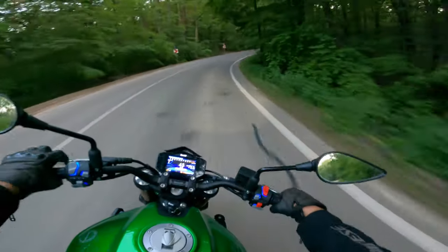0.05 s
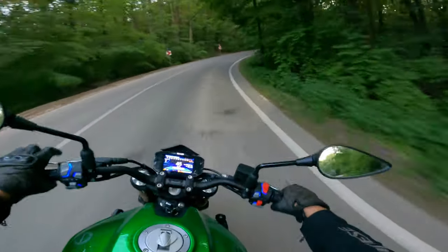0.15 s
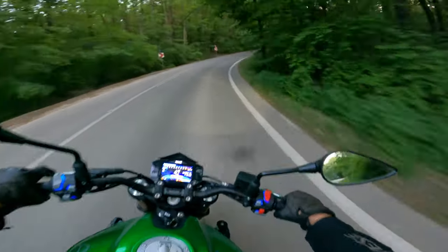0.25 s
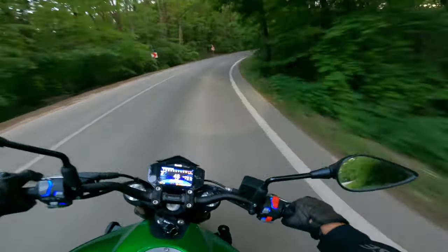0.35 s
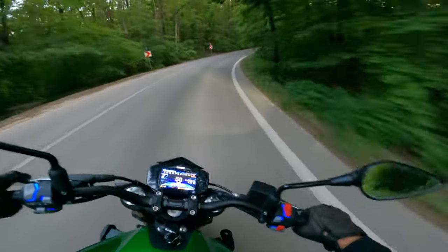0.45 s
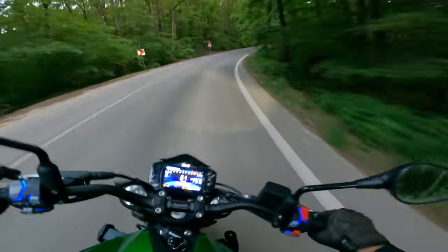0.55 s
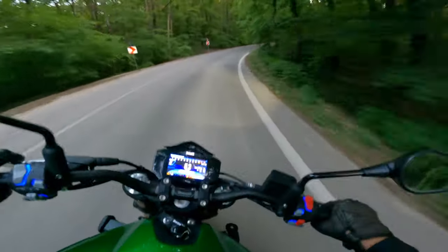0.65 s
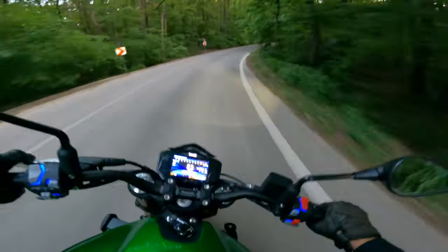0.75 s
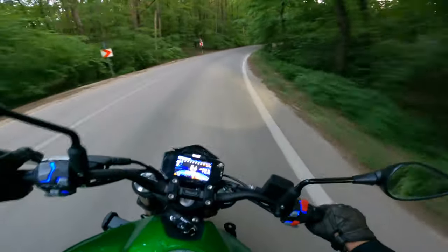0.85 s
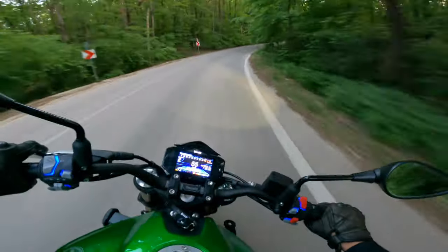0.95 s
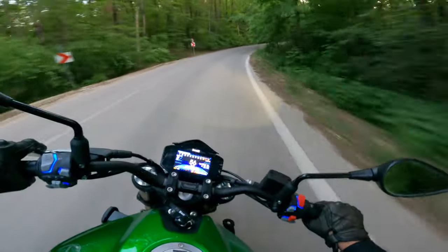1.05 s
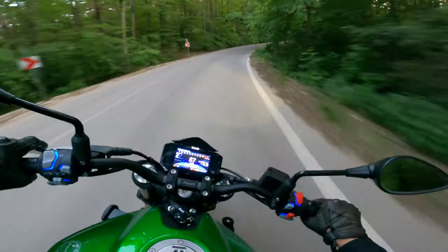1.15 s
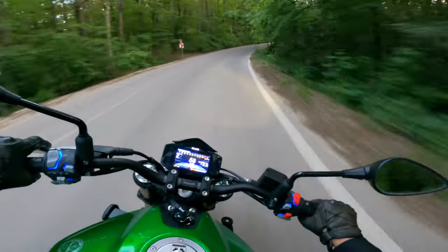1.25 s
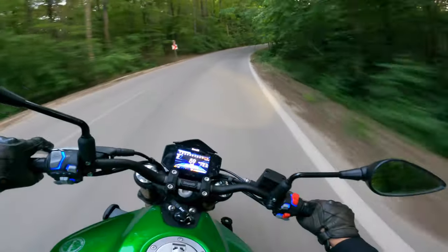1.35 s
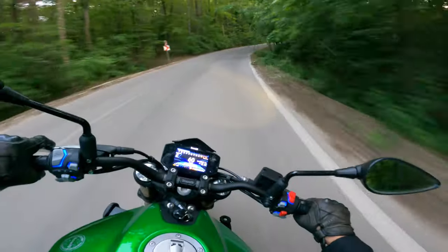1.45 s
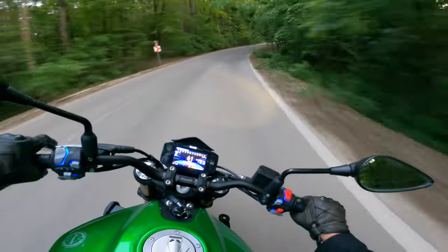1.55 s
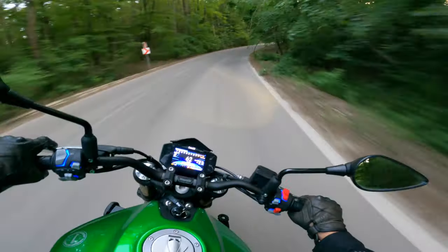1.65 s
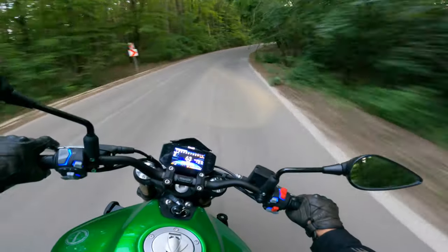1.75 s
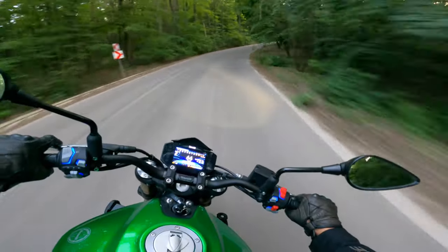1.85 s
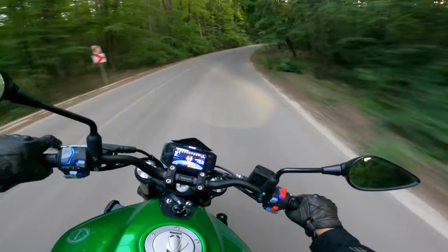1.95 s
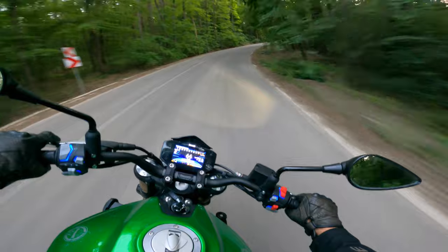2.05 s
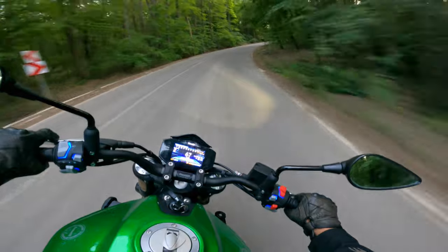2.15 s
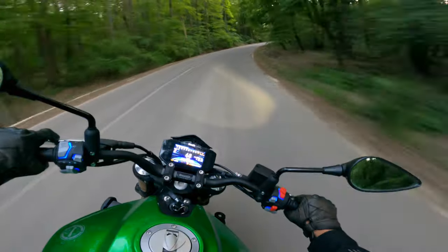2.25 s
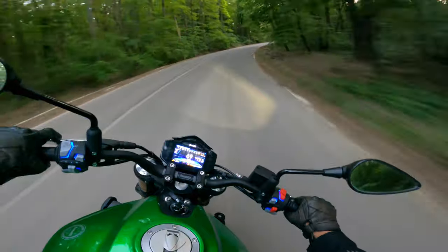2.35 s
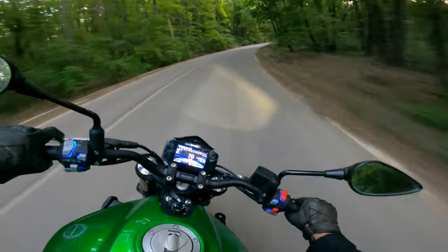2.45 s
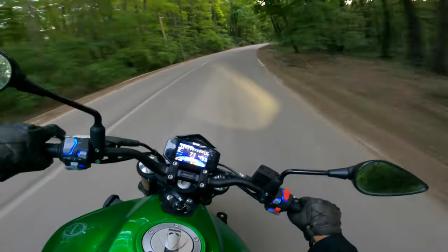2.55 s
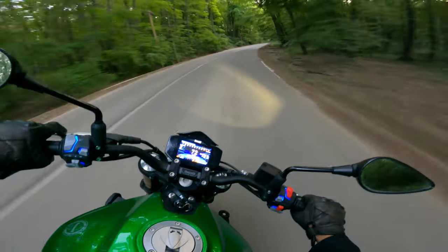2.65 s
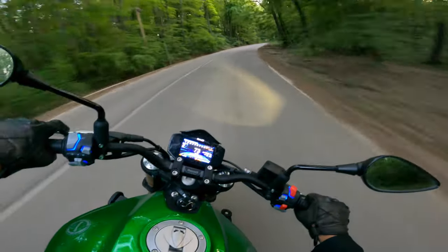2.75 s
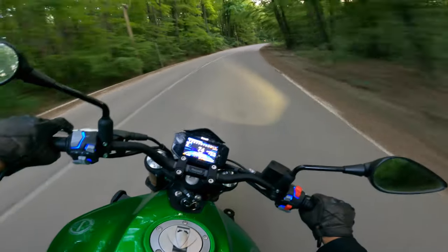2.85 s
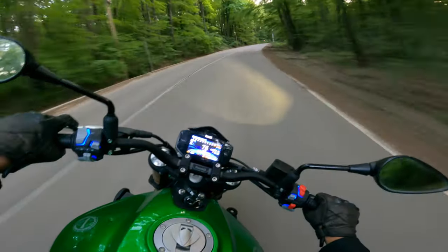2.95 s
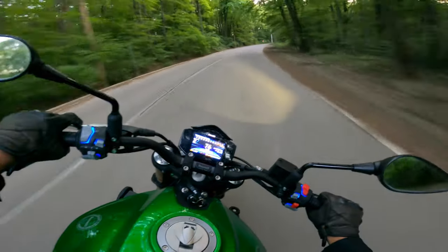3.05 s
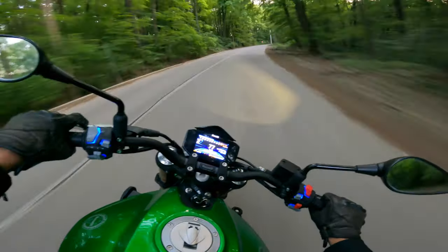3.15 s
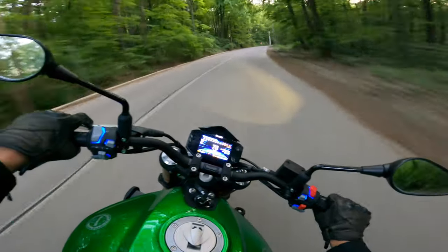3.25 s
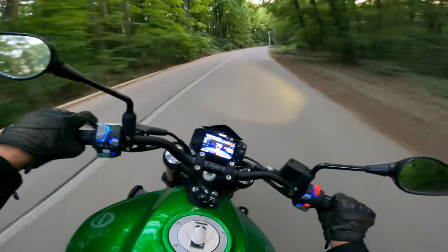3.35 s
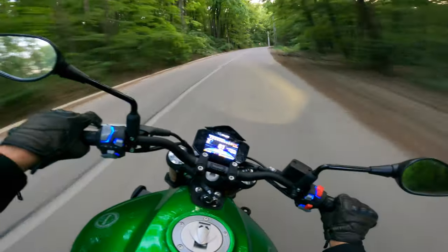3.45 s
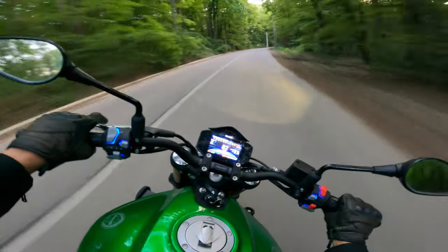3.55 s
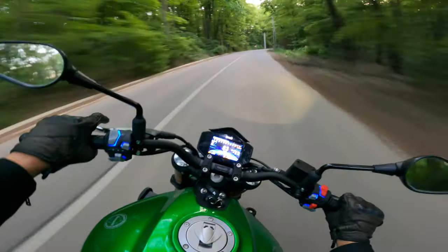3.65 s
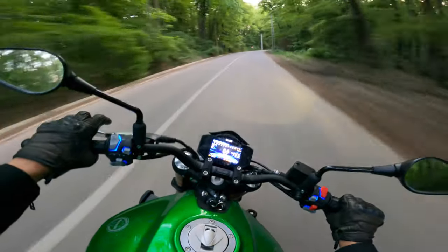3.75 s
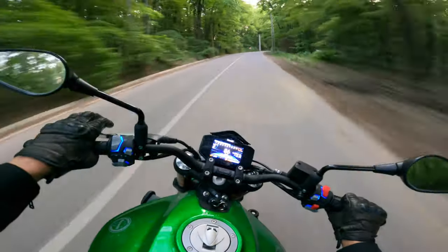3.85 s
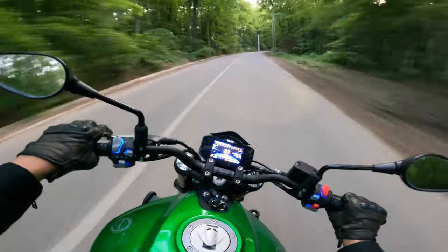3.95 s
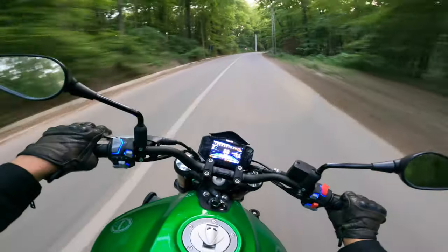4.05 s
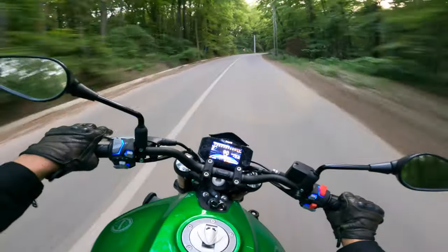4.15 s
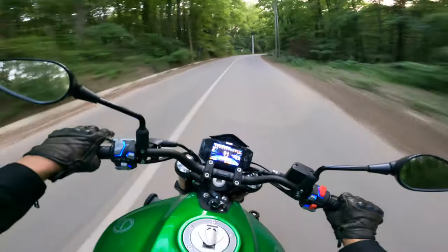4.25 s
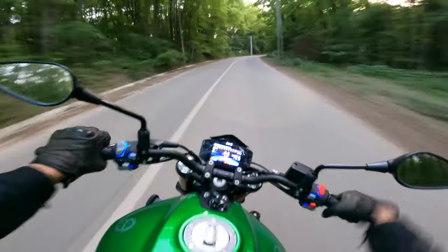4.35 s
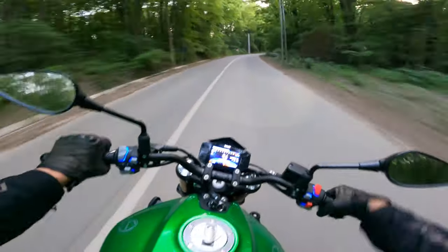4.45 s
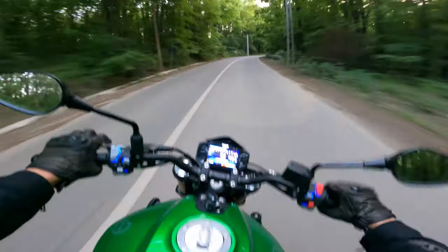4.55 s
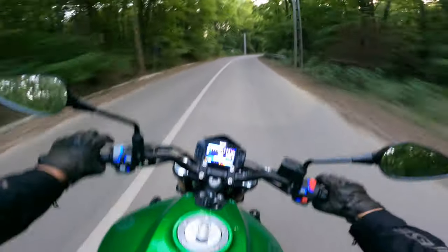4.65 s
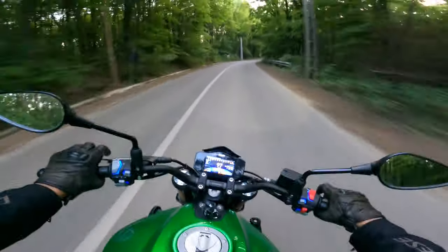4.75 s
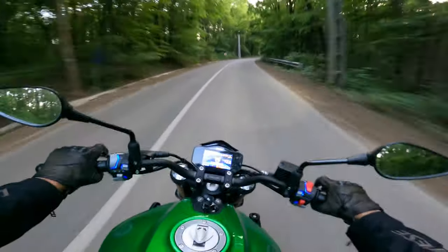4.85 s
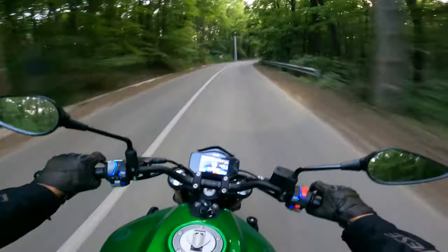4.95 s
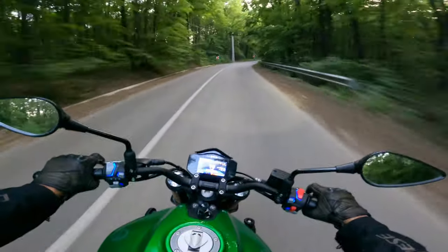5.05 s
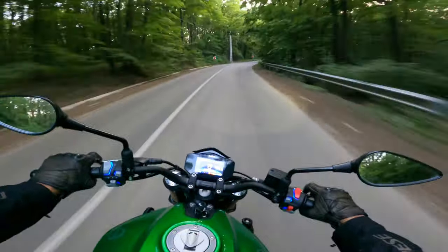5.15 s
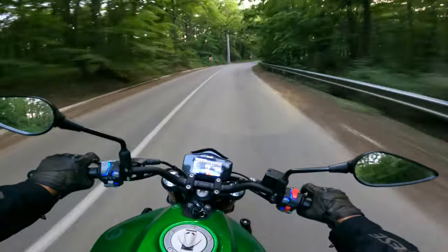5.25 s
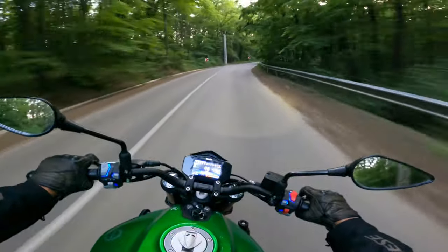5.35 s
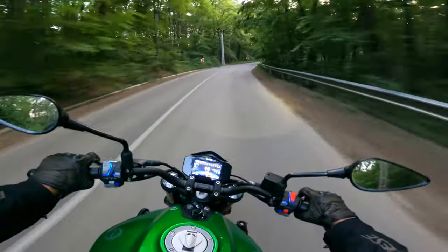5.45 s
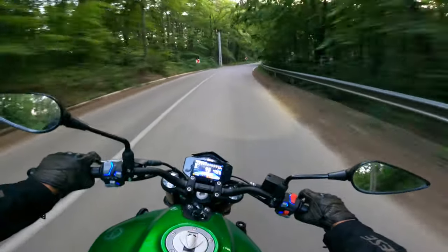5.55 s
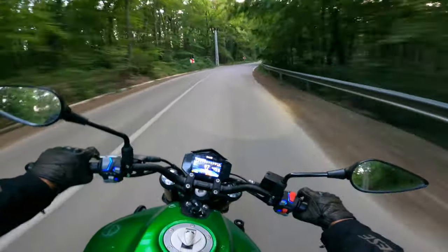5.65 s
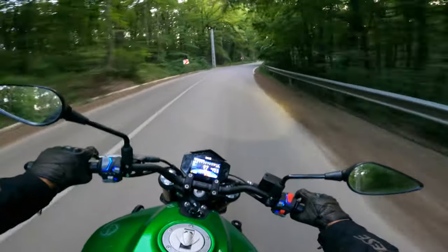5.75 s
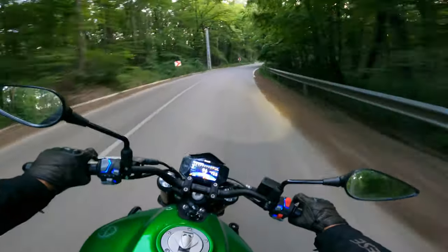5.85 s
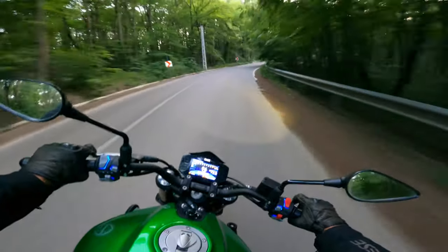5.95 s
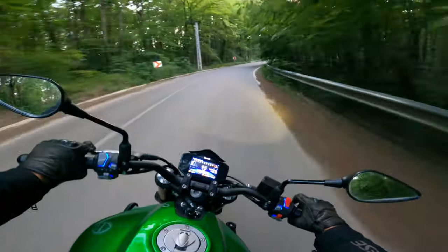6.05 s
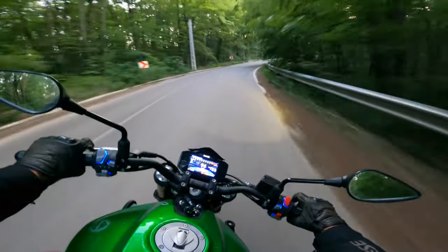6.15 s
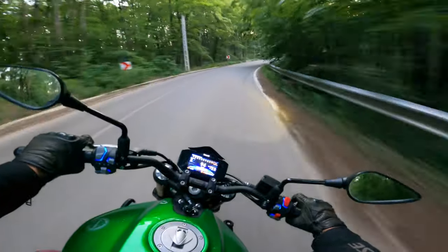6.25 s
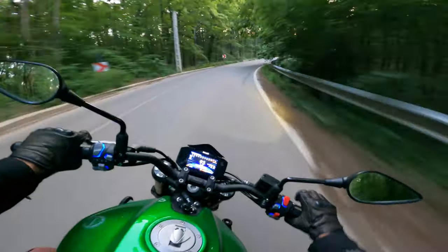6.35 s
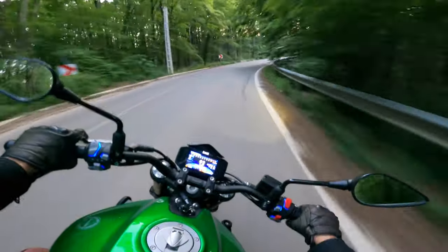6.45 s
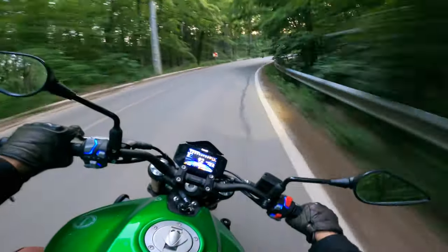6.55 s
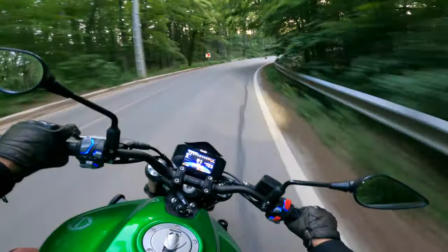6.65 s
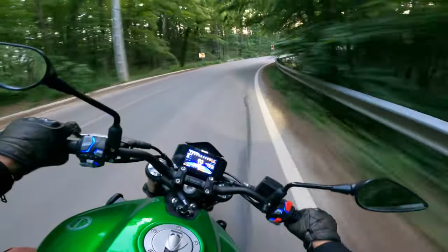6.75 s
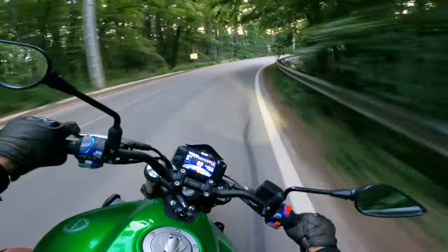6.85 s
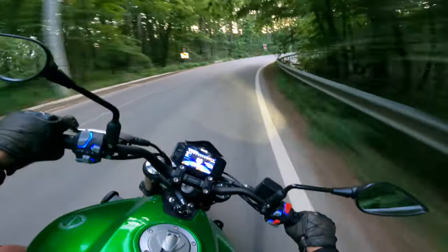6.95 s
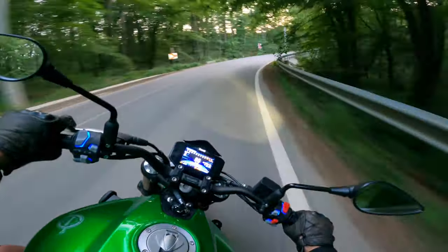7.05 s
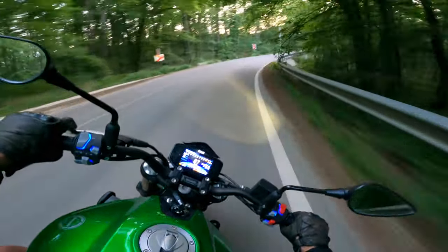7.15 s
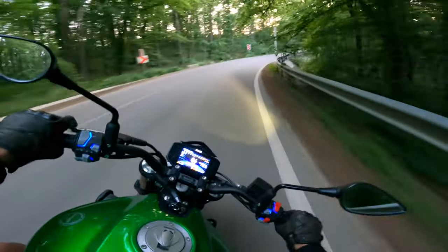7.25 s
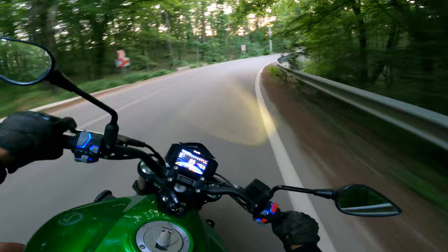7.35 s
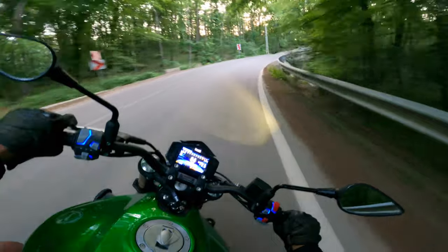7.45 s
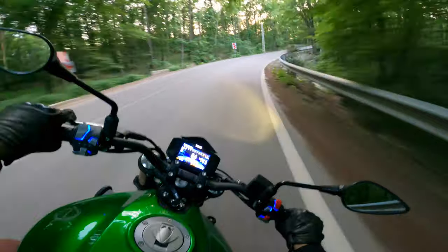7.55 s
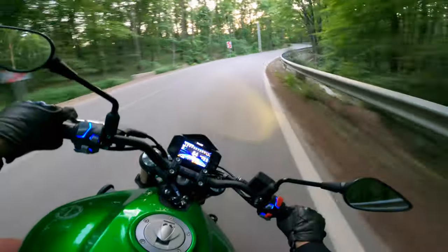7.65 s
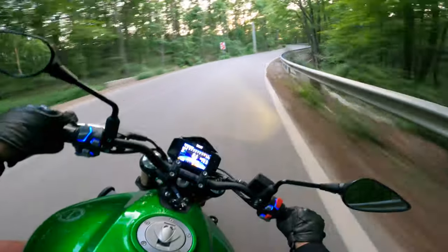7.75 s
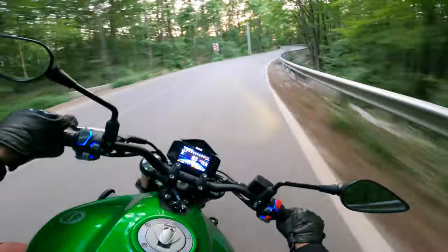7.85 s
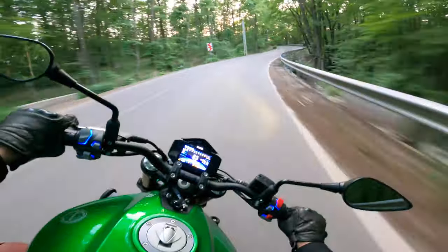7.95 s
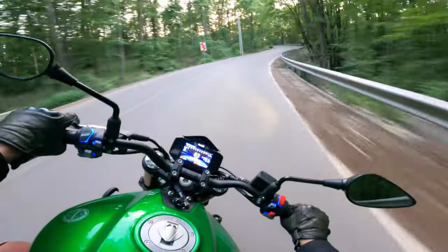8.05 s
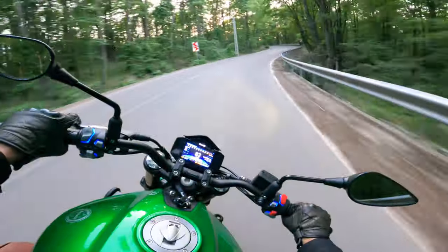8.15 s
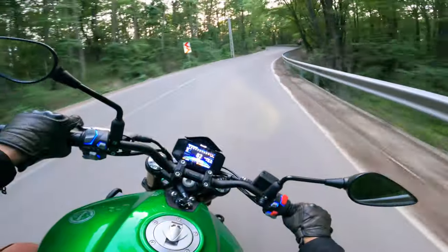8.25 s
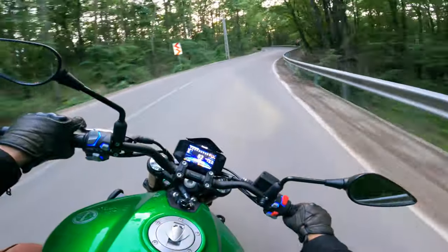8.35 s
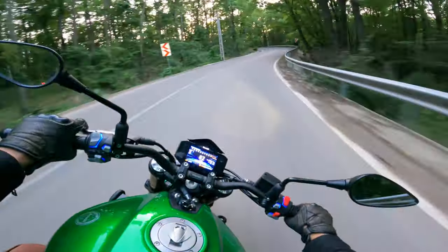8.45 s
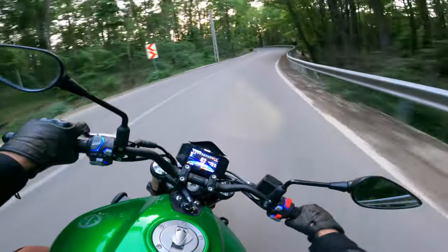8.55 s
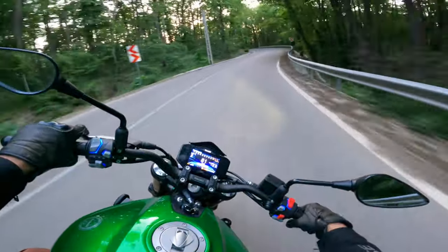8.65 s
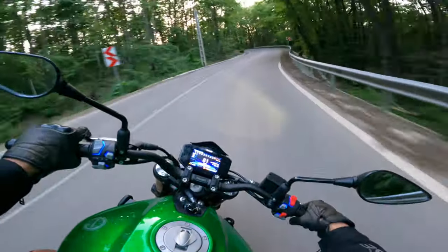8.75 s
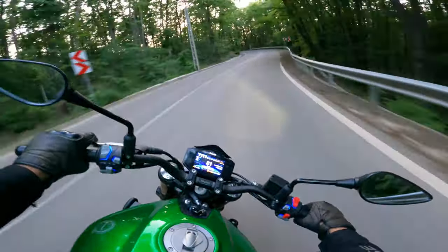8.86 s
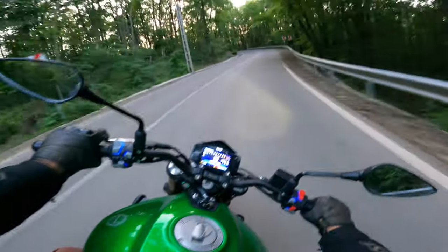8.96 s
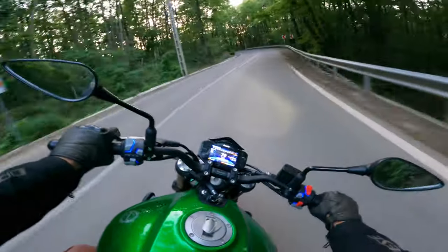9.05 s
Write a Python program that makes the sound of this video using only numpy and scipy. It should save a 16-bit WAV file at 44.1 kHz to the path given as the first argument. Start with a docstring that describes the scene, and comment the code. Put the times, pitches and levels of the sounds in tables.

```python
"""A motorcycle with two unevenly firing cylinders, close by at the rider's helmet, shifts, pulls hard,
shifts up, coasts down and cruises in rushing wind.
Open throttle makes the airbox honk: two resonances ring with every gulp of air. The exhaust drones in low
orders and puffs, the casings rasp with bangs and noise, and sines at multiples of engine speed whine as gears.
Short metal knocks mark shifts and chain; low stereo noise buffets the two microphone ports."""
import sys
import numpy as np
from scipy import signal
from scipy.fft import rfft, irfft, next_fast_len
from scipy.io import wavfile
from scipy.ndimage import uniform_filter1d, map_coordinates

SR = 44100
rng = np.random.default_rng(int(sys.argv[2]) if len(sys.argv) > 2 else 0)


def to_wav(sig):
    """Store sig (one row per channel, or 1-D mono) as 16-bit WAV at the path in sys.argv[1].

    Samples outside -1..1 are clipped; the rate is SR.
    """
    pcm = np.clip(np.atleast_2d(sig), -1, 1) * 32767
    pcm = np.round(pcm).astype(np.int16)
    wavfile.write(sys.argv[1], SR, pcm.T)  # frames by channels


N = 400869
TIME = np.arange(N) / SR  # s
FIRING_GAP = 3 / 8  # share of a four-stroke cycle from one cylinder's firing to the other's


def amp(db):
    """Decibels as an amplitude factor."""
    return 10 ** (np.asarray(db) / 20)


def unit(x):
    """x at rms 1 overall."""
    return x / np.sqrt(np.mean(x ** 2) + 1e-20)


def steady(x):
    """x at rms 1 throughout, by its power smoothed twice over a twelfth of a second."""
    power = uniform_filter1d(uniform_filter1d(x * x, SR // 12), SR // 12)
    return x / np.sqrt(np.abs(power) + 1e-12)


def along(points, hz):
    """(Hz, value) points read on a log frequency axis."""
    f, v = np.transpose(points)
    return np.interp(np.log(hz + 1), np.log(f + 1), v)


def curves(rows):
    """One value per sample for each column after the time."""
    s, *columns = np.transpose(rows)
    return [np.interp(TIME, s, column) for column in columns]


def wobble(rate):
    """A smooth random curve, rate knots a second."""
    knots = rng.standard_normal(int(N * rate / SR) + 4)
    return map_coordinates(knots, [np.arange(N) * rate / SR])


def filtered(x, response):
    """x times a complex response of frequency."""
    m = next_fast_len(N + SR // 2)
    return irfft(rfft(x, m) * response(np.fft.rfftfreq(m, 1 / SR)), m)[..., :N]


def causal(points):
    """The minimum-phase response with the gain of (Hz, dB) points."""
    def response(hz):
        cepstrum = irfft(np.log(amp(along(points, hz))))
        half = len(cepstrum) // 2
        folded = np.r_[cepstrum[0], 2 * cepstrum[1:half], np.zeros(len(cepstrum) - half)]
        return np.exp(rfft(folded))
    return response


def pulses(turns, gap, second_db, scatter_db, jitter):
    """Two pulses a cycle, gap of a cycle apart, with scatter in size and in time (share of a cycle)."""
    out, cycle = np.zeros(N + 1), np.arange(int(turns[-1]))
    for late, db in [(0 * turns, 0), (gap, second_db)]:
        draw = rng.standard_normal((1000, 2))[:len(cycle)]
        at = np.interp(cycle + jitter * draw[:, 0], turns - late, np.arange(N))
        out += np.bincount(at.astype(int), amp(db + scatter_db * draw[:, 1]), N + 1)
    return out[:N]


def rush(spectrum, alike, patchy_db):
    """Stereo noise of rms 1, with patches of random gain and a left-right likeness set by frequency."""
    z = signal.stft(rng.standard_normal((2, N)), nperseg=512)[2]
    patches = uniform_filter1d(uniform_filter1d(rng.standard_normal(z.shape[1:]), 6, 0), 10, 1)
    pair = signal.istft(z * amp(patchy_db * unit(patches)), nperseg=512)[1][:, :N]

    def mid_side_gain(hz):
        angle = np.arccos(np.clip(along(alike, hz), -1, 1)) / 2
        return amp(along(spectrum, hz)) * [np.cos(angle), np.sin(angle)]

    mid, side = filtered(pair, mid_side_gain)
    return unit(np.array([mid + side, mid - side]))


# Level of the wind buffeting: time_s, level_db
BUFFET_LEVEL = [(0, -40), (1.67, -41), (2.33, -41.5), (3.29, -41.5), (3.62, -36), (4.03, -38), (4.38, -32),
                (5.11, -38), (5.8, -38.5), (6.23, -36.5), (7.6, -43), (8.33, -39.5), (9.09, -40)]
# Tone of the wind: pitch_hz, relative level_db
WIND_TONE = [(15, -29.5), (30, -17), (50, -6), (90, -9), (160, -15), (300, -17), (450, -20), (600, -71),
             (1500, -120)]


def wind():
    """Low noise right at the microphone buffets in lumps, partly different at each port."""
    lumps = amp(0.64 * np.array([wobble(4.6), wobble(16.0)]))
    likeness = [(25, -0.3), (50, -0.73), (90, 0.055), (250, .9)]  # (Hz, left-right likeness)
    level_db, = curves(BUFFET_LEVEL)
    return amp(level_db) * unit(lumps * rush(WIND_TONE, likeness, patchy_db=0.5))


# Whines of gears, chain and valve train: multiple of the cycle rate, waver_hz, start_s, end_s, level_db
WHINES = [(12, 2, 4.62, 5.9, -50), (20, 2, .26, .53, -52), (23, 2, 7.28, 8.37, -54), (40, 8, .8, 1.75, -60),
          (40, 8, 1.75, 4.4, -68), (40, 3, 2.97, 3.3, -51), (62, 40, 3.35, 4.4, -69),
          (102, 90, .7, 1.8, -73), (147, 80, 6.0, 8.42, -77), (168, 100, 8.75, 9.2, -80)]
FADE_DB_PER_S = 154.5  # of a whine before and after its stretch


def gears(cycles):
    """Teeth mesh at fixed multiples of engine speed, a little unsteadily in pitch and level."""
    out = np.zeros(N)
    for teeth, waver_hz, start, end, db in WHINES:
        outside_s = np.maximum(0, np.maximum(start - TIME, TIME - end))
        level = amp(db - FADE_DB_PER_S * outside_s + 2.1 * wobble(25))
        pitch_hz = teeth * cycles + waver_hz * wobble(300)
        out += np.sqrt(2) * level * np.sin(2 * np.pi * np.cumsum(pitch_hz) / SR)
    return out


# Shift and chain knocks: start_s, tick level_db before its tone filter, knock_db added to that, knock pitch_hz
KNOCKS = [(0.029, -58, 14.5, 2400), (0.129, -54.5, 7, 1980), (.235, -63.5, 18, 2255),
          (4.47, -50.5, 8.5, 1480), (4.599, -54, 6, 1474), (5.212, -58.5, 11, 1486),
          (7.03, -65.5, 28.5, 1251), (7.185, -56.5, 8, 2005)]


def clacks():
    """Short metal ticks over a duller knock of narrow noise, each with a quick rise and a steady dB decay."""
    ticks, knocks, t = np.zeros(N + SR), np.zeros(N + SR), np.arange(SR // 10) / SR
    for s, db, knock_db, hz in KNOCKS:
        tick_level = amp(db - 60 * t / 0.048) * (1 - np.exp(-t / 0.0016))
        ticks[round(s * SR):][:len(t)] += tick_level * rng.standard_normal(len(t))
        slow_noise = uniform_filter1d(uniform_filter1d(rng.standard_normal(len(t)), size=50), size=50)
        knock_level = amp(db + knock_db - 60 * t / .11) * (1 - np.exp(-t / .002))
        knocks[round(s * SR):][:len(t)] += knock_level * unit(slow_noise) * np.sin(2 * np.pi * hz * t)
    tick_tone = causal([(1000, -22), (3000, 15.5), (6000, 2.5), (12000, -7.0)])  # (Hz, dB)
    return filtered(ticks[:N], tick_tone) + knocks[:N]


def casings(x, spread_s):
    """The path through frame and tank draws each bang out: every kilohertz higher arrives spread_s later."""
    return filtered(x, lambda hz: np.exp(-1j * np.pi * spread_s * hz ** 2 / 1000))


# Tones of the rasp, of the clatter above it and of the treble hiss: pitch_hz, relative level_db
RASP_TONE = [(270, -31.5), (460, -6), (497, -3.5), (539, -3.5), (583, -3.5), (641, -4), (823, -6.5),
             (937, -16.5), (1000, -29.5), (1300, -34.5), (2200, -120)]
CLATTER_TONE = [(590, -21), (1000, 0.5), (1130, -2), (1260, -1.5), (1630, -5.5), (1780, -6), (1960, -13.5),
                (2150, -6), (2660, -18.5), (3050, -42), (3960, -53.5), (6710, -120)]
HISS_TONE = [(2300, -30.5), (2900, -0.5), (3500, -7.5), (4200, -4.5), (4800, -8.5), (5600, -10.5),
             (6300, -14), (8000, -15.5), (10000, -19.5), (12500, -25), (15500, -31)]
# Treble hiss: time_s, level_db before the throb
HISS_LEVEL = [(0, -67.5), (.15, -66.5), (.25, -70), (.5, -74), (.66, -67), (2.5, -63), (4.38, -56.5),
              (4.44, -63), (4.7, -67), (5.4, -68.5), (5.9, -67.5), (6.1, -63.5), (7.0, -68.5), (7.2, -65),
              (8.4, -65), (8.6, -68), (9.09, -69)]
# Likeness of rasp and clatter noise at the two ports: pitch_hz, left-right likeness
NOISE_LIKENESS = [(60, 0.73), (100, 0.9), (180, 0.86), (300, 0.87), (520, 1), (890, 0.12), (1520, 0.037),
                  (2600, 1)]


def rasp(turns, rasp_db, clatter_db, regular):
    """Firing bangs heard through the casings: a regular share, the rest noise that throbs with the cycle."""
    shots = pulses(turns + .05, FIRING_GAP + 0 * turns, second_db=-3, scatter_db=.8, jitter=.0006)
    bangs = casings(shots, spread_s=.007)
    angle = 2 * np.pi * turns
    throb = unit(1 + 0.13 * np.cos(angle * 2) + 0.11 * np.cos(angle * 3) + 0.11 * np.cos(angle))
    clean, noisy = 0, 0
    for tone, db in [(RASP_TONE, rasp_db), (CLATTER_TONE, clatter_db)]:
        clean = clean + amp(db) * np.sqrt(regular) * steady(filtered(bangs, causal(tone)))
        noise = throb * rush(tone, NOISE_LIKENESS, patchy_db=0.5)
        noisy = noisy + amp(db + 4.6) * np.sqrt(1 - regular) * noise
    hiss_db, = curves(HISS_LEVEL)
    hiss_likeness = [(3000, .5), (5000, .3), (8000, 0), (15000, -.2)]  # (Hz, left-right likeness)
    hiss = amp(hiss_db) * throb ** .6 * rush(HISS_TONE, hiss_likeness, patchy_db=1.4)
    return clean, noisy + hiss


# Silencer tone of the puffs heard under load: pitch_hz, relative level_db
PUFF_TONE = [(20, -81), (135, -39.5), (165, -9), (190, 6), (215, 11), (245, -2), (290, 5.5), (350, -15),
             (500, -48.5), (1500, -120)]
# Silencer tone of the burble: pitch_hz, relative level_db
BURBLE_TONE = [(20, -71.5), (110, -28), (160, 3.5), (210, -5.5), (265, 3), (310, 0.5), (370, -13),
               (420, -12.5), (560, -21.5), (800, -22), (2000, -120)]


def exhaust(turns, orders_db, puff_db, burble_db):
    """The silencer passes three low orders, a softer train of puffs and a burble of uneven pulses."""
    crank = 2 * np.pi * (turns - .36)
    drone = np.zeros(N)
    for order, db in enumerate(orders_db, 1):
        # the sign that two equal firings, FIRING_GAP apart about crank zero, give this order
        sign = np.sign(np.cos(np.pi * order * FIRING_GAP))
        drone += amp(db + 0.42 * wobble(17)) * sign * np.cos(order * crank)
    gap = FIRING_GAP + 0 * turns
    puffs = pulses(turns - .1, gap, second_db=-1.0, scatter_db=0.0, jitter=0.00032)
    burble = pulses(turns - .01, gap, second_db=-9, scatter_db=.5, jitter=.0012)
    puffing = amp(puff_db) * steady(filtered(puffs, causal(PUFF_TONE)))
    burbling = amp(burble_db) * steady(filtered(burble, causal(BURBLE_TONE)))
    return np.sqrt(2) * drone + puffing + burbling


# Airbox resonances: pitch_hz, width_hz, level_db
AIRBOX = [(339.7, 29.1, 6.5), (405.7, 40.2, 0.5)]
# Gap from the first cylinder's gulp to the second's: engine cycles_per_s, share of a cycle
GULP_GAP = [(38, 0.357), (41, 0.3665), (47, 0.3642), (53, 0.3753), (57, 0.3815), (60, 0.353), (66, 0.388)]
# Brief swells of the airbox honk: peak time_s, peak level_db, length_s to either side
SWELLS = [(0.027, -37.5, 0.027), (0.112, -33, .08), (0.24, -35.5, 0.013), (4.487, -26.5, 0.05),
          (4.571, -33.5, 0.035), (4.801, -40.5, 0.13), (4.859, -30.5, 0.019), (4.915, -26.5, 0.03),
          (7.035, -23, 0.018)]
# The throttle snaps open: start_s, strength_db of the air slap
SNAPS = [(.55, 26), (7.029, 22.5), (8.933, 18.5)]


def duct(hz):
    """Two airbox resonances of opposite sign, dulled below about 250 Hz and above about 600 Hz."""
    box = 0
    for k, (centre, width, db) in enumerate(AIRBOX):
        damping = 1j * hz * width
        box = box + (-1) ** k * amp(db) * damping / (centre * centre - hz * hz + damping)
    return box / (1 + (250 / (hz + 1)) ** 4) / (1 + (hz / 600) ** 4)


def intake(cycles, turns, honk_db):
    """Each gulp of air rings the two airbox resonances; a throttle snapped open rings them once, hard."""
    gap = np.interp(cycles, *np.transpose(GULP_GAP))
    gulps = pulses(turns, gap, second_db=-1.4, scatter_db=.5, jitter=.0013)
    snaps = np.zeros(N)
    for s, db in SNAPS:
        snaps[round(s * SR)] = amp(db)
    swell = np.zeros(N)
    for s, db, length in SWELLS:
        swell += amp(db) * np.clip(1 - np.abs(TIME - s) / length, 0, 1) ** 2
    return (amp(honk_db) + swell) * steady(filtered(gulps, duct)) + filtered(snaps, duct)


# The throttle is held open: opening start_s, opening length_s, closing start_s, closing length_s
PULLS = [(.535, .025, 4.385, 0.055), (7.031, .07, 8.4, 0.098)]
# Levels with the throttle open, then closed: engine cycles_per_s, 1st, 2nd and 3rd exhaust order level_db,
# honk level_db, puff level_db, burble level_db, rasp level_db, clatter level_db
OPEN_LEVELS = [(37.37, -51, -42.5, -39, -28.5, -43.5, -44, -46, -55),
               (39.2, -49.5, -39, -42, -29.5, -38.5, -54.5, -44, -56),
               (40.77, -45.5, -33, -32, -25.5, -35.5, -49, -39, -51.5),
               (43.7, -45, -30.5, -32.5, -23.5, -36, -56.5, -37, -49.5),
               (47.06, -44.5, -30, -36.5, -26, -35, -53, -40.5, -49.5),
               (51.8, -41.5, -28.5, -34, -23.5, -34.5, -60, -40, -42.5),
               (53.26, -41.5, -27, -35.5, -24, -38, -49.5, -37.5, -41.5),
               (57.7, -39.5, -28, -36, -18, -41.5, -49, -31.5, -38),
               (62.6, -36.5, -29.5, -48.5, -18.5, -40.5, -58.5, -30.5, -37.5),
               (66.8, -37, -31.5, -40, -11, -50, -46, -29.5, -35)]
CLOSED_LEVELS = [(34.2, -58, -40, -33, -41.5, -62.5, -40.5, -50, -59),
                 (37.95, -52.5, -38, -33.5, -41.5, -57.5, -39, -50, -59),
                 (41.5, -50.5, -37, -33.5, -46, -56.5, -36.5, -47, -57),
                 (48.5, -42.5, -33.5, -34.5, -43, -53.5, -32.5, -46, -54),
                 (48.6, -47.5, -33.5, -39, -41, -55.5, -34, -43.5, -55),
                 (54, -45.5, -30.5, -36, -36.5, -52, -28.5, -44, -50),
                 (66, -41.5, -32, -29, -32.5, -48.5, -27.5, -39.5, -48.5)]
# Regular share of the rasp's power: engine cycles_per_s, share with throttle open, share with it closed
REGULAR = [(37, .5, .35), (41, .85, .35), (66, .9, .4)]


def engine_map(cycles):
    """The throttle (0 to 1), the levels and the rasp's regular share, blended between open and closed."""
    throttle = np.zeros(N)
    for start, rise, end, fall in PULLS:
        throttle += np.clip((TIME - start) / rise, 0, 1) * np.clip(1 - (TIME - end) / fall, 0, 1)

    def read(rows):
        speeds, *columns = np.transpose(rows)
        return np.array([np.interp(cycles, speeds, column) for column in columns])

    levels_db = throttle * read(OPEN_LEVELS) + (1 - throttle) * read(CLOSED_LEVELS)
    share_open, share_closed = read(REGULAR)
    return throttle, levels_db, throttle * share_open + (1 - throttle) * share_closed


# Level difference between the ports: pitch_hz, left-over-right level_db
SIDEWAYS = [(60, -3), (91, -1.2), (140, -.4), (210, -1.5), (320, -1.2), (490, -1.5), (740, -4.5),
            (1130, 10.5), (1710, 2.5), (2600, .5)]
# Phase by which left leads right: pitch_hz, lead_rad
LEAD = [(0, -0.5), (860, 0.5), (1120, 5), (1550, 4), (1810, 4.5), (2150, 9), (2760, 8)]


def to_ports(engine):
    """The helmet shades and delays the path to one port, by pitch: half the difference goes to each."""
    def ports(hz):
        half = amp(along(SIDEWAYS, hz) / 2) * np.exp(.5j * along(LEAD, hz))
        return np.array([half, half ** -1])
    return filtered(engine, ports)


# Engine speed through the ride: time_s, four-stroke cycles_per_s
SPEED = [(0, 52.7), (.1, 48.7), (.2, 39.4), (.28, 37.5), (.52, 36.9), (.62, 40), (.69, 37.7), (.76, 38.4),
         (1.11, 40.6), (1.92, 45.8), (2.51, 49.0), (2.71, 50.5), (3.44, 57.1), (4.0, 62.2), (4.35, 65.8),
         (4.43, 64.9), (4.48, 62.5), (4.58, 56.1), (4.63, 48.3), (4.66, 45.9), (4.76, 47.4), (5.21, 45.4),
         (5.57, 43.4), (5.74, 43.1), (6.25, 39.5), (6.48, 39.1), (6.91, 37.4), (7.1, 37.6), (7.16, 38.6),
         (7.26, 37.5), (8.4, 37.4), (8.55, 35.5), (8.63, 35.7), (9.09, 33.7)]
LULL_DB = 6  # deepest sag of the exhaust drone, at half throttle as it opens or closes


def scene():
    """Engine speed and throttle drive the firing sounds; knocks, honk swells, snaps and hiss keep their own times."""
    cycles, = curves(SPEED)
    turns = np.cumsum(cycles) / SR
    throttle, levels_db, regular = engine_map(cycles)
    *orders_db, honk_db, puff_db, burble_db, rasp_db, clatter_db = levels_db
    orders_db = orders_db - LULL_DB * (2 * throttle) * (2 - 2 * throttle)
    bangs, noise = rasp(turns, rasp_db, clatter_db, regular)
    engine = gears(cycles) + clacks() + bangs
    engine = engine + exhaust(turns, orders_db, puff_db, burble_db) + intake(cycles, turns, honk_db)
    return wind() + amp([[.4], [-.4]]) * noise + to_ports(engine)  # noise leans slightly left


def record(dry):
    """The camera keeps nothing above its band limit of 15.7 kHz."""
    return filtered(dry, lambda hz: hz < 15700)


dry = scene()
out = record(dry)
to_wav(out)
```